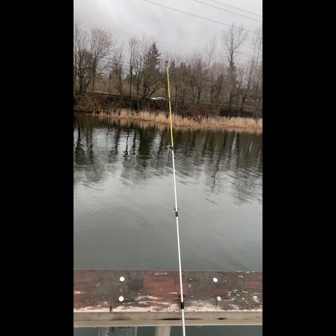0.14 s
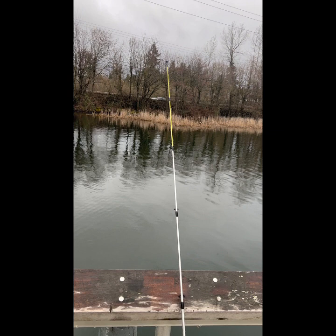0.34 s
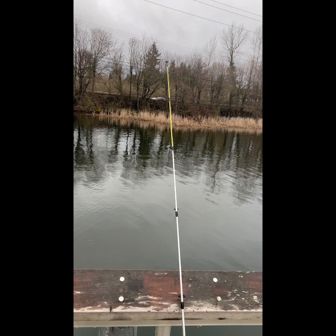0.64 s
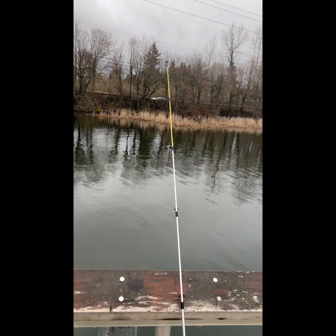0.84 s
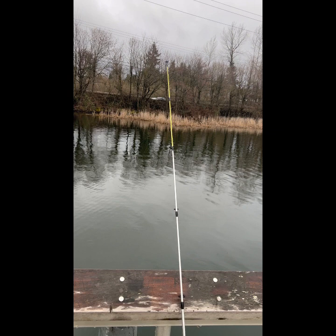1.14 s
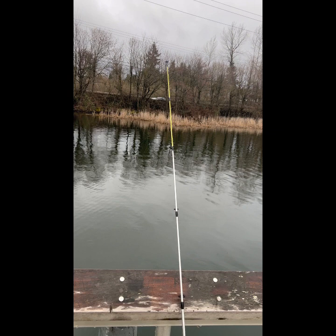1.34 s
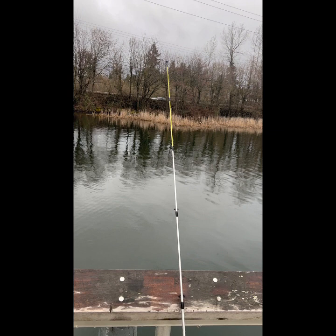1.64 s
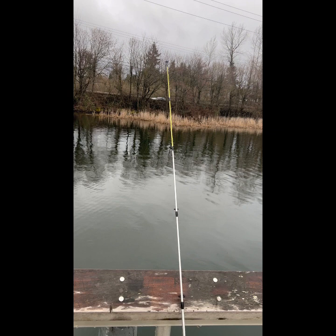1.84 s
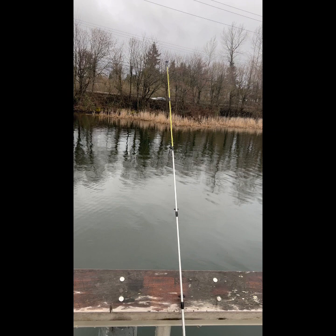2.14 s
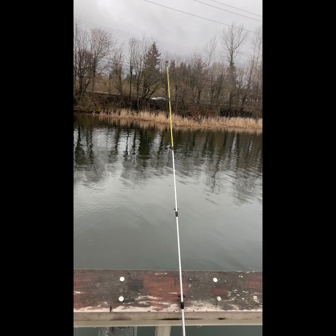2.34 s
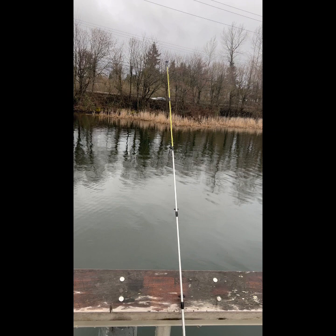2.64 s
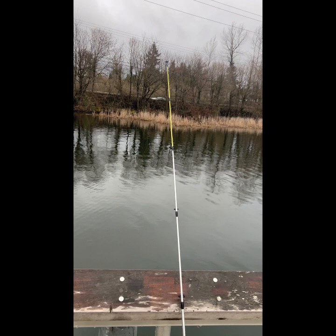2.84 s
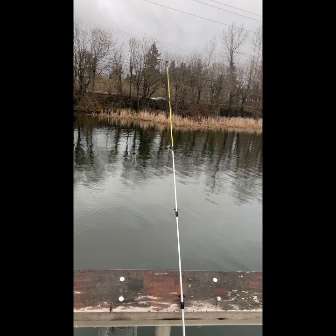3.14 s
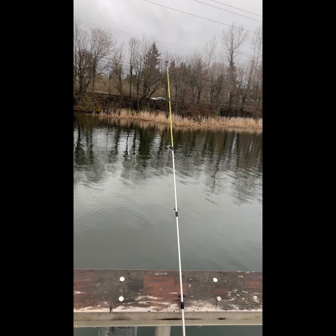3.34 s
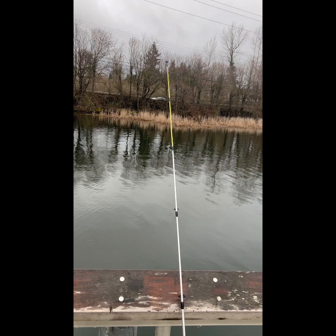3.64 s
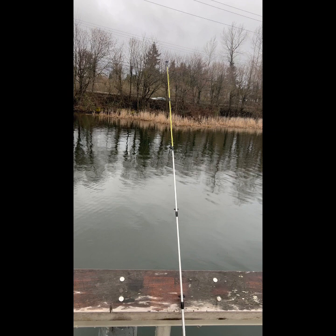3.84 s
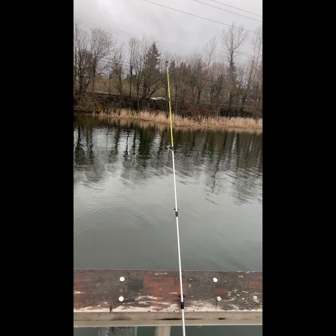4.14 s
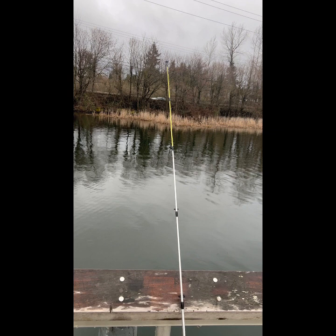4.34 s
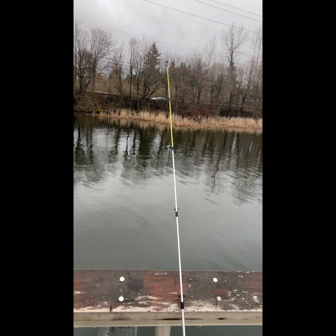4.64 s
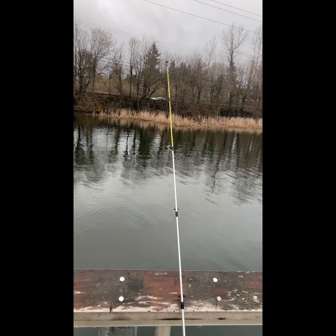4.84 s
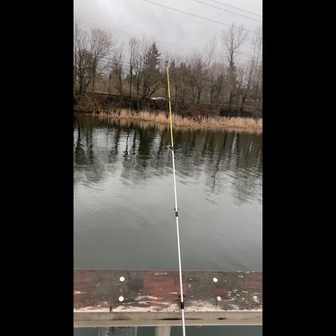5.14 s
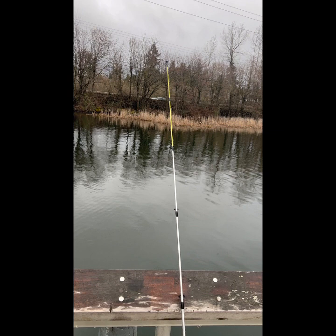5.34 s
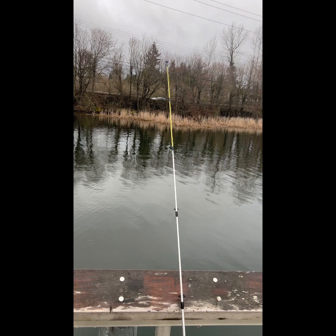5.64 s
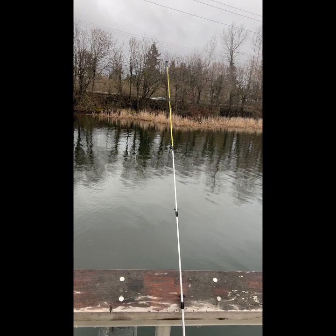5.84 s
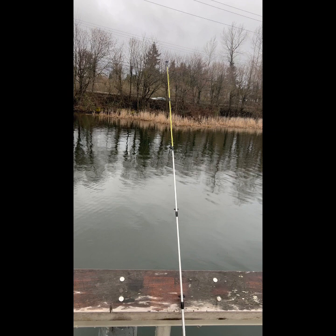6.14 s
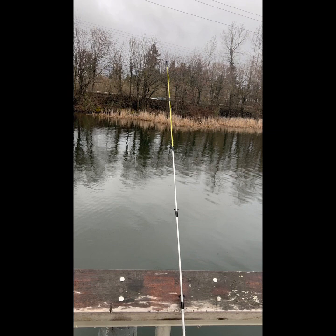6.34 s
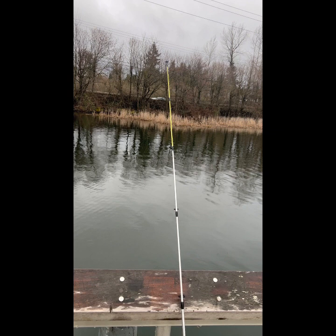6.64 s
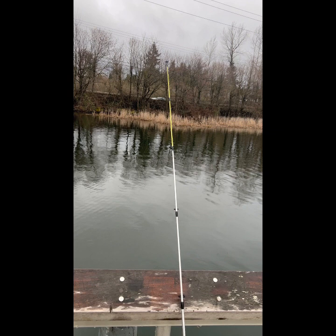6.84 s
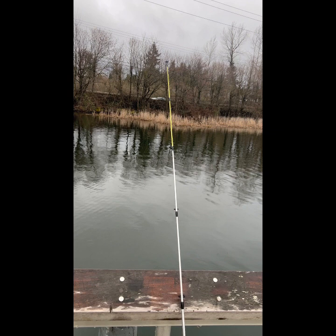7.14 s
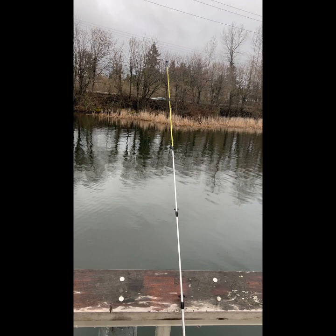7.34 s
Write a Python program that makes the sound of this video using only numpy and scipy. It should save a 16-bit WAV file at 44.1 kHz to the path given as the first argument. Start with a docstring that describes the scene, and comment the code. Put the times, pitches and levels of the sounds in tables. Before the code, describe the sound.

Distant tyre roar and rumble carry over water as an engine drone rises and recedes, while fishing tackle ticks lightly nearby.

```python
"""A steady tyre roar over low rumble: road traffic across a lake, heard from a fishing deck.
One engine's exhaust hum carries over the water, swells and fades. Close to the microphone,
tackle or clothing sticks and slips in short scrapes, small ticks and soft rustles.
A faint tone slides down, then up again; far off in the trees a small bird peeps."""
import sys
import numpy as np
from scipy import signal
from scipy.fft import rfft, irfft
from scipy.io import wavfile

SR = 44100
rng = np.random.default_rng(int(sys.argv[2]) if len(sys.argv) > 2 else 0)


def wrap_up_sound(samples):
    """Save the sound to the file named by the first command line argument, as 16-bit audio."""
    columns = np.atleast_2d(samples).T
    # keep every value between -1 and 1, then stretch to whole-number steps
    tamed = np.clip(columns, -1, 1)
    steps = np.round(tamed * 32767).astype(np.int16)
    wavfile.write(sys.argv[1], SR, steps)


N = 329411
TIME = np.arange(N) / SR

# small bird, far off: t/s, length/s, f/Hz, peak level/dB
BIRD_PEEPS = [(1.533, .11, 5450, -66), (1.725, .12, 5420, -65)]
# faint gliding tones: t/s, length/s, first f/Hz, last f/Hz, level/dB, final blur/share of pitch
TONE_SLIDES = [(0.96, 0.634, 347.7, 235.7, -32.8, 0.0079), (1.725, 0.37, 338.4, 640, -34.5, 0.3)]
# cloth, close by: peak t/s, level/dB, swell/(dB per s)
CLOTH_RUSTLES = [(0.77, -60, 19), (4.88, -62, 18), (6.42, -52, 36.5)]
# resonances of the rubbed tackle: f/Hz, width/Hz, relative level/dB
TACKLE_MODES = [(480, 210, -6.5), (810, 310, 3), (1440, 520, 6), (1914, 120, 5), (2237, 140, 9.5),
                (2650, 190, 4.5), (3070, 130, 0), (3504, 130, 4.5), (3890, 150, -0.5), (4540, 140, 1),
                (4970, 190, -3.5), (5530, 62, -7), (6100, 98, -9), (6460, 150, -23.5)]
# scrapes, close by: t/s, rise/s, fall/s, level/dB, tilt/(dB per octave)
NEAR_SCRAPES = [(1.170, 0.013, 0.027, -31.5, -4.5), (1.3646, 0.0021, 0.027, -28.5, -2),
                (3.712, .027, 0.0077, -31, -2.5), (3.942, 0.029, 0.027, -28, -2)]
# ticks, close by: t/s, level before tick_db/dB, tilt/(dB per octave)
NEAR_TICKS = [(0.9744, -29, -4), (0.9817, -25.5, -1.5), (1.3663, -26, -2), (1.4381, -35, -2),
              (2.1086, -31, -2), (3.9684, -26, 1), (4.1325, -28.5, -3), (4.4149, -41, 3.5),
              (4.4702, -40.5, 5), (4.4904, -41, 7), (4.7402, -33, -2), (6.3794, -36, -1), (6.431, -34, -1)]
# cars on the nearest stretch: closest t/s, tyre level/dB
CAR_PASSES = [(0.05, -43.5), (5.6, -44), (7, -47.5)]
# one engine eases off, pulls hard, then draws away:
# t/s, cycle f/Hz, fourth-order level/dB, fifth-order level/dB
ENGINE_RUN = [(0, 30.1, -24.5, -33), (0.55, 30.65, -30.5, -35), (1.2, 29.2, -36, -35),
              (2.05, 31.01, -28.5, -38.5), (2.4, 31.7, -23.5, -34.5), (2.8, 32.42, -25, -26.5),
              (3.05, 32.1, -19.5, -30), (3.25, 31.9, -26, -32.5), (3.6, 31.86, -23.5, -27),
              (4.1, 31.53, -24, -35), (4.55, 31.38, -27.5, -39.5), (4.95, 30.6, -34, -47)]
# its weaker lines: order/multiple of the cycle rate, level against the fourth order/dB
WEAK_ORDERS = [(2.5, -26), (6.5, -23.5), (8, -27.5), (9, -18.5), (11.5, -27), (12.5, -25)]
# the far tyre roar, and a faint high hiss that swells and dips:
# t/s, relative level of the roar/dB, relative level of the treble/dB
ROAR_AND_HISS = [(0, 1.5, 0), (1.4, -0.5, 1), (2.3, 1.3, -2), (3.4, 0.7, -2.5), (4.2, 2, 1.5), (5.7, 2, -4),
                 (6.4, 0.6, 3), (7.47, 1.2, 0.5)]
# the road's colour at the deck: f/Hz, relative spectral level/dB
ROAD_SPECTRUM = [(20, -41), (32, -18.5), (50, -5), (78, -1.5), (120, 0), (200, -5), (310, -6.5),
                 (430, -9.5), (680, -10), (870, -7.5), (1250, -14.5), (2100, -28.5), (3700, -39),
                 (5500, -46.5), (7200, -61.5)]


def undb(db):
    """Decibels to gain."""
    return 10 ** (np.asarray(db) / 20)


def unit(x):
    """Scale to rms 1."""
    return x / np.sqrt(np.mean(x ** 2) + 1e-18)


def curves(table):
    """The columns of a table of timed rows, joined by straight lines."""
    times, *columns = np.transpose(table)
    return [np.interp(TIME, times, column) for column in columns]


def walk(rate):
    """Random drift of rms 1, changing about rate times a second."""
    hz = np.fft.rfftfreq(N, 1 / SR)
    lowpass = np.exp(-(hz / rate) ** 2) * (hz > 0)
    return unit(irfft(rfft(rng.standard_normal(N)) * lowpass, N))


def resonance(hz, centre_hz, width_hz):
    """Complex response of one resonance, gain 1 at its centre."""
    return 1j * hz * width_hz / (centre_hz ** 2 - hz ** 2 + 1j * hz * width_hz)


def hump(x, centre_hz, width_hz):
    """One resonance applied twice, for steep sides; rms 1."""
    response = resonance(np.fft.rfftfreq(N, 1 / SR), centre_hz, width_hz)
    return unit(irfft(rfft(x) * response ** 2, N))


def add(out, start_s, sound):
    """Mix a sound in at start_s."""
    start = int(start_s * SR)
    out[start:start + len(sound)] += sound[:N - start]


def bird(waver=0.013):
    """Thin, wavering peeps from distant trees."""
    out = 0
    for start, length, hz, db in BIRD_PEEPS:
        swell = np.sin(np.pi * np.clip((TIME - start) / length, 0, 1))
        pitch = hz * (1 + waver * walk(120))
        out = out + undb(db) * swell * np.sin(2 * np.pi * np.cumsum(pitch) / SR)
    return out


def sliding_tones(attack_s=0.12, hold_until_s=0.24, mid_glide_s=0.172, glide_s=0.06, flutter_db=2.0):
    """Faint, nearly pure tones, each with one S-shaped glide; the rising one blurs into a swish."""
    out = 0
    for start, length, first_hz, last_hz, db, blur in TONE_SLIDES:
        t = TIME - start
        glide = (1 + np.tanh((t - mid_glide_s) / glide_s)) / 2
        hz = (first_hz + (last_hz - first_hz) * glide) * (1 + blur * glide * walk(83))
        tone = np.sqrt(2) * np.sin(2 * np.pi * np.cumsum(hz) / SR)
        envelope = np.interp(t, [0, attack_s, hold_until_s, length], [0, 1, 1, 0])
        out = out + tone * envelope * undb(db + flutter_db * walk(15))
    return out


def slips(size, spread_db):
    """Dense tiny stick-slip impulses; a few are far stronger than the rest."""
    grains = rng.standard_normal(size)
    strength_db = spread_db * np.minimum(rng.exponential(size=size), 5)
    return unit(grains * undb(strength_db))


def cloth_rustle(grain_db=5.0, catch_db=2.0, centre_hz=4100, width_hz=3300, fade_db_per_s=44.5):
    """Cloth near the microphone slides and catches: fine grains in one broad treble hump."""
    rubbing = sum(undb(db - np.maximum(swell * (peak - TIME), fade_db_per_s * (TIME - peak)))
                  for peak, db, swell in CLOTH_RUSTLES)
    grains = hump(slips(N, grain_db), centre_hz, width_hz)
    return grains * rubbing * undb(catch_db * walk(35))


def tackle_ring(force, tilt_db, pivot_hz=3500, cutoff_hz=7500):
    """A contact force rings the tackle; a harder contact, with more tilt, is brighter."""
    hz = np.maximum(np.fft.rfftfreq(len(force), 1 / SR), 1)
    body = sum(undb(db) * resonance(hz, centre, width) for centre, width, db in TACKLE_MODES)
    body = body * undb(tilt_db * np.log2(hz / pivot_hz)) / (1 + (hz / cutoff_hz) ** 8)
    return irfft(rfft(force) * body / np.sqrt(np.mean(abs(body) ** 2)), len(force))


def contact(pressure, tilt_db, db):
    """Slips under a pressure curve ring the tackle; db is the rms level at pressure 1."""
    force = slips(len(pressure), spread_db=2.2) * pressure
    return undb(db) * unit(tackle_ring(force, tilt_db)) * np.sqrt(np.mean(pressure ** 2))


def tackle_handling(jerk_db=4, tick_s=0.0021, tick_db=-6, tail_db=-13, tail_s=0.039, size=8192):
    """Close up, jerky runs of slips scrape, with a weak tail off the deck; brief bursts tick."""
    out, t = np.zeros(N), np.arange(size) / SR
    for start, rise, fall, db, tilt_db in NEAR_SCRAPES:
        jerks = undb(jerk_db * np.tanh(walk(220)[:size]))
        pressure = np.interp(t, [0, rise, rise + fall], [0, 1, 0]) * unit(jerks)
        tail = undb(tail_db) * np.exp(-abs(t - rise) / tail_s) * (t > rise)
        add(out, start, contact(pressure + tail, tilt_db, db))
    for start, db, tilt_db in NEAR_TICKS:
        add(out, start, contact(np.exp(-t / tick_s), tilt_db, db + tick_db))
    return out


def far_exhausts(centre_hz=78, width_hz=24, level_db=-39):
    """The most distant engines merge into one low, beating drone."""
    return hump(rng.standard_normal(N), centre_hz, width_hz) * undb(level_db)


def nearer_tyres(centre_hz=1550, width_hz=950, flicker_db=1.5, half_power_s=0.61):
    """Cars on the nearest stretch lose less treble to the air, so the roar brightens as they pass."""
    power = sum(undb(db) ** 2 / (1 + ((TIME - closest) / half_power_s) ** 2)
                for closest, db in CAR_PASSES)
    tyres = hump(rng.standard_normal(N), centre_hz, width_hz)
    return tyres * np.sqrt(power) * undb(flicker_db * walk(4.7))


def engine(waver=0.0026, flutter_db=1.2, fading_db=3, leave_db_per_s=30):
    """Low exhaust orders carry over the water; the fourth and fifth beat at the cycle rate."""
    cycle_hz, fourth_db, fifth_db = curves(ENGINE_RUN)
    phase = 2 * np.pi * np.cumsum(cycle_hz * (1 + waver * walk(9.2))) / SR
    hum = 0
    for order, db in ((4, fourth_db), (5, fifth_db)):
        gain = undb(db + flutter_db * walk(3.1))
        hum = hum + gain * np.sin(order * phase + rng.uniform(0, 2 * np.pi))
    # the weaker lines fade in and out as their paths to the microphone interfere
    for order, db in WEAK_ORDERS:
        gain = undb(fourth_db + db + fading_db * walk(4.3))
        hum = hum + gain * np.sin(order * phase + walk(4))
    leaving = undb(-leave_db_per_s * np.maximum(TIME - ENGINE_RUN[-1][0], 0))
    return np.sqrt(2) * hum * leaving


def far_road(base_db=-29.5, swell_db=0.58, flicker_db=0.5, rumble_hz=380, hiss_hz=2300):
    """Traffic across the lake: half-octave bands swell together and flicker alone in moving air."""
    hz = np.maximum(np.fft.rfftfreq(N, 1 / SR), 1)
    points_hz, points_db = np.transpose(ROAD_SPECTRUM)
    colour = undb(np.interp(np.log(hz), np.log(points_hz), points_db))
    noise = irfft(rfft(rng.standard_normal(N)) * colour, N)
    spectrum = rfft(unit(noise))
    roar_db, hiss_db = curves(ROAR_AND_HISS)
    rumble_db = 3.2 - 0.5251 * TIME  # the rumble slowly recedes
    swell, out = walk(1.5), 0
    for centre in 2 ** np.arange(4, 14, .5):
        triangle = np.maximum(1 - 2 * abs(np.log2(hz / centre)), 0)
        band = irfft(spectrum * triangle, N)
        # engines own the bass, tyres the middle; above them a faint high hiss swells and dips
        bass = 1 / (1 + (centre / rumble_hz) ** 4)
        treble = 1 / (1 + (hiss_hz / centre) ** 4)
        band_db = bass * rumble_db + treble * hiss_db + (1 - bass - treble) * roar_db
        out = out + band * undb(band_db + swell_db * swell + flicker_db * walk(3.4))
    return out * undb(base_db)


def scene():
    """The far shore and the small sounds close by, at one microphone on the deck."""
    traffic = far_road() + nearer_tyres() + far_exhausts() + engine()
    return (traffic + tackle_handling() + cloth_rustle() + sliding_tones() + bird())[None]


def record(dry, cutoff_hz=7250):
    """The phone on the deck cuts the treble steeply."""
    return signal.sosfilt(signal.ellip(12, .2, 80, cutoff_hz, fs=SR, output="sos"), dry)


dry = scene()
out = record(dry)
wrap_up_sound(out)
```